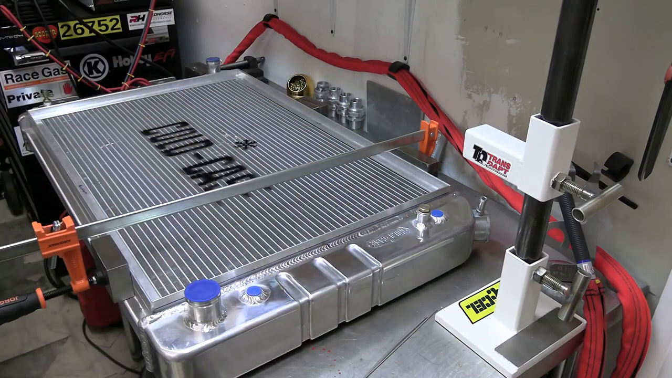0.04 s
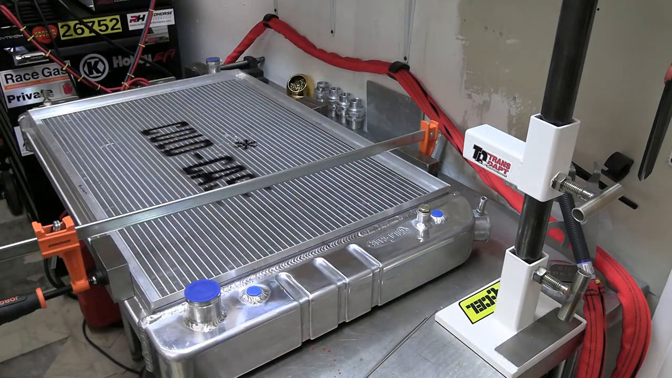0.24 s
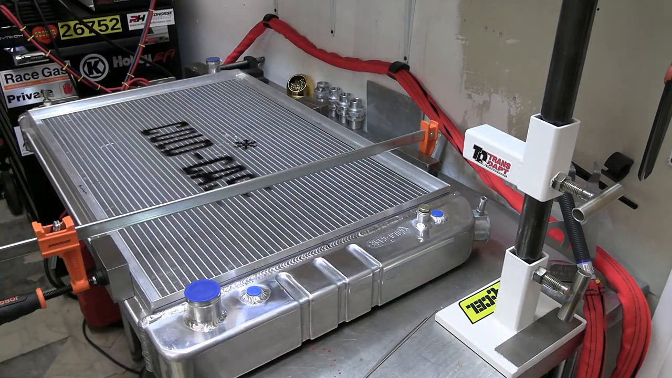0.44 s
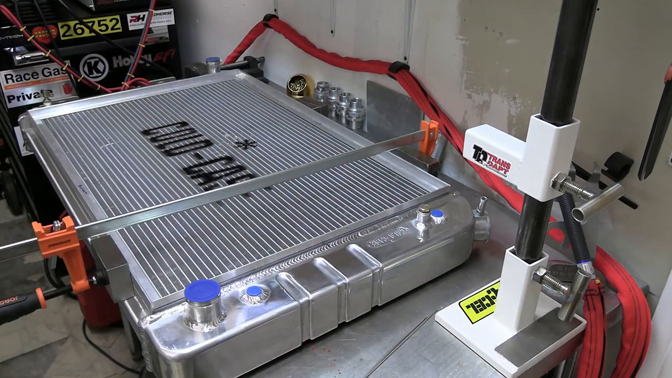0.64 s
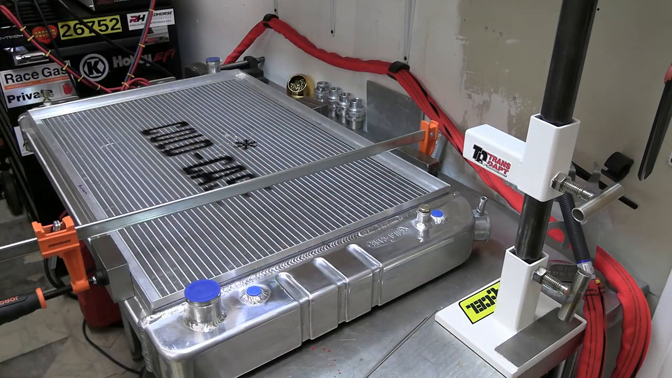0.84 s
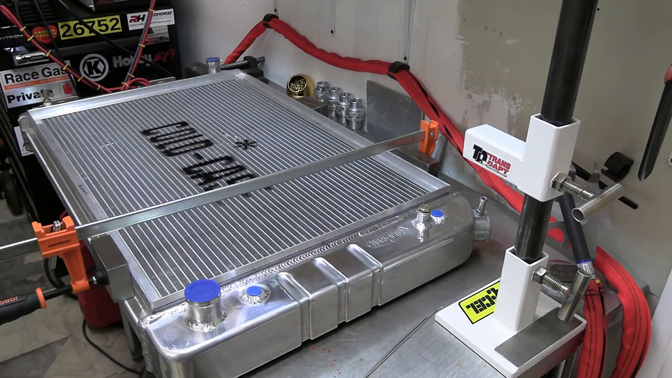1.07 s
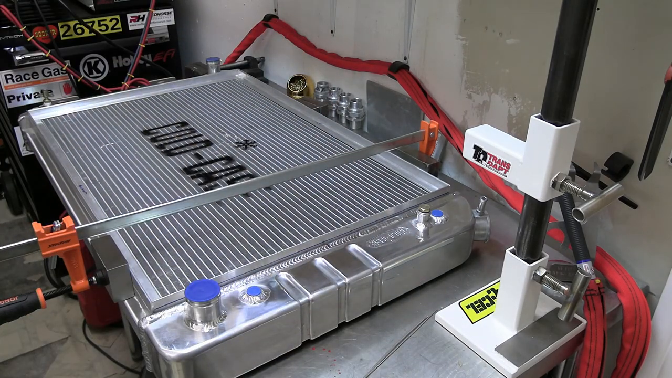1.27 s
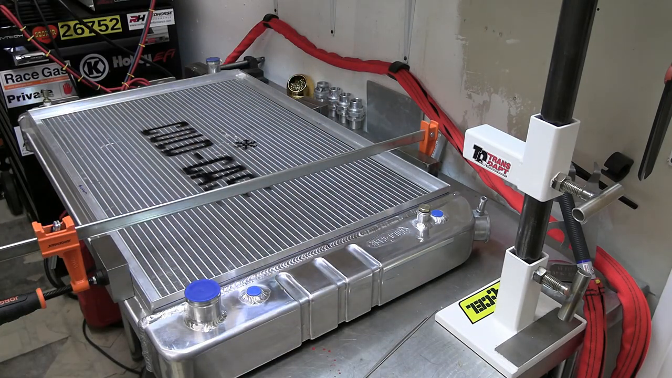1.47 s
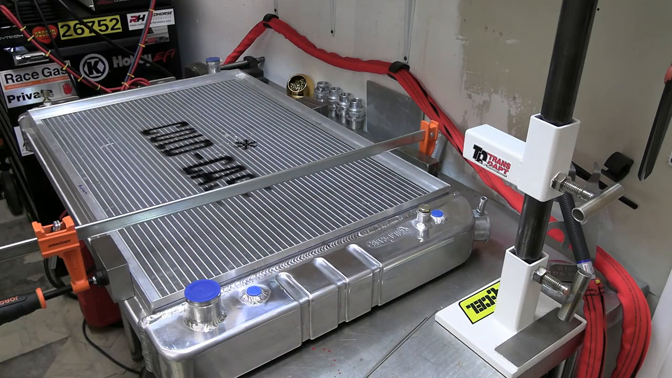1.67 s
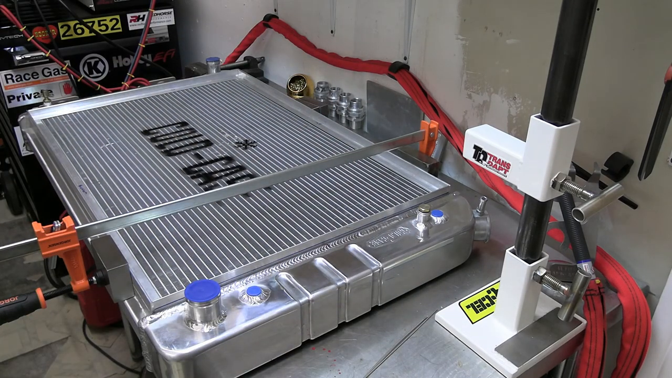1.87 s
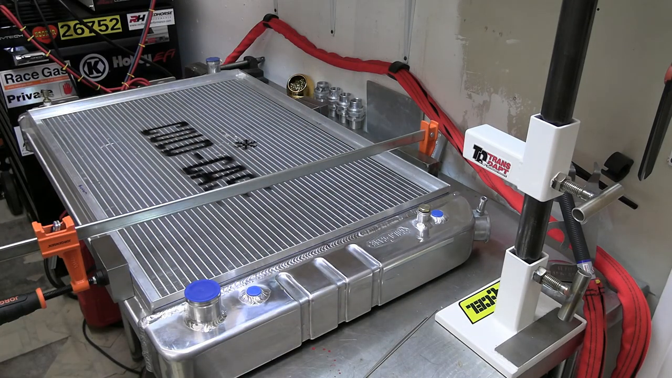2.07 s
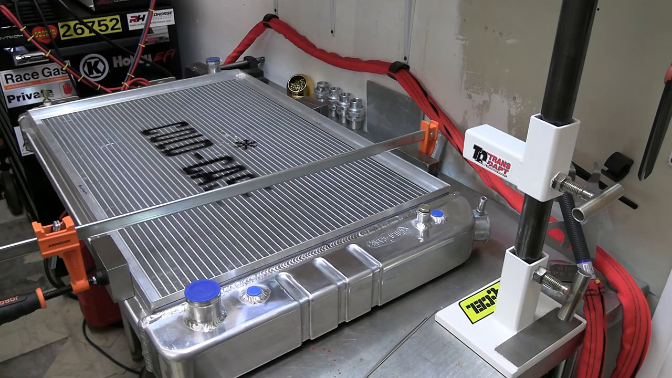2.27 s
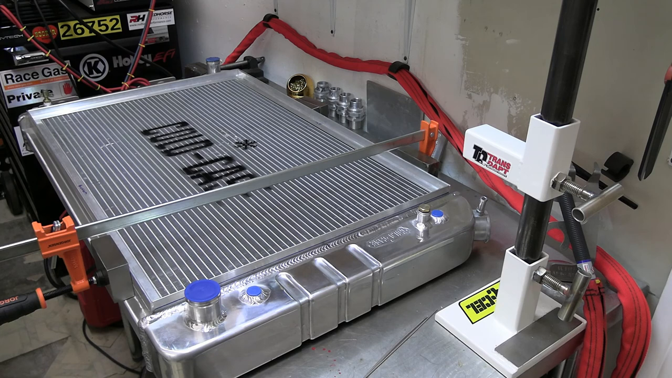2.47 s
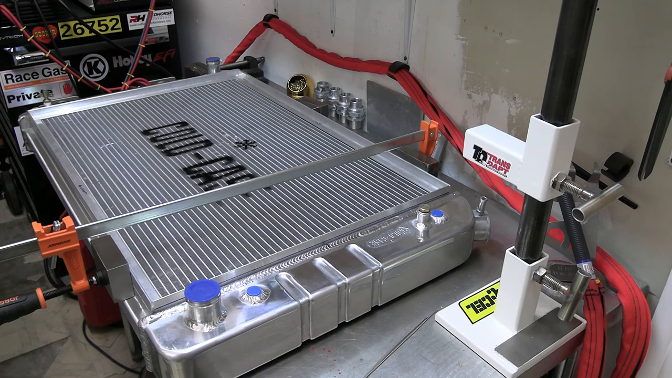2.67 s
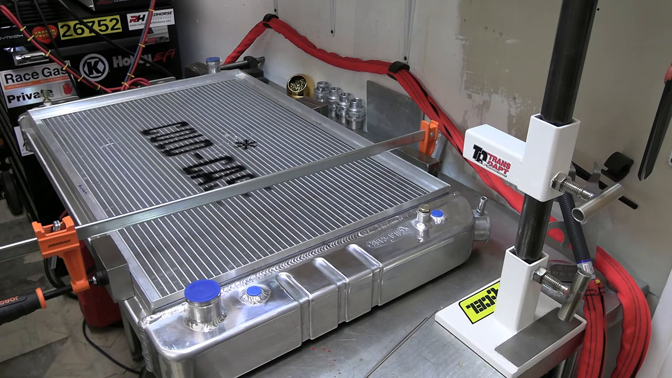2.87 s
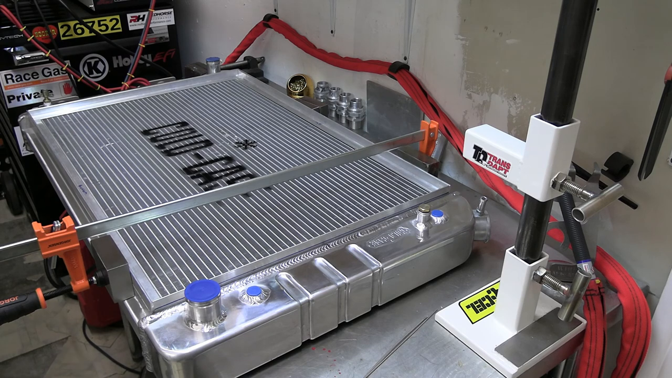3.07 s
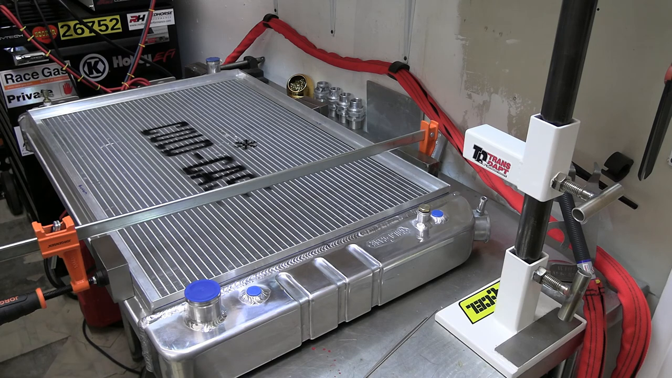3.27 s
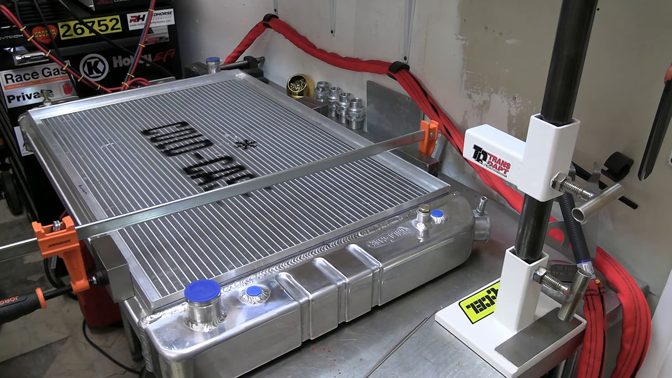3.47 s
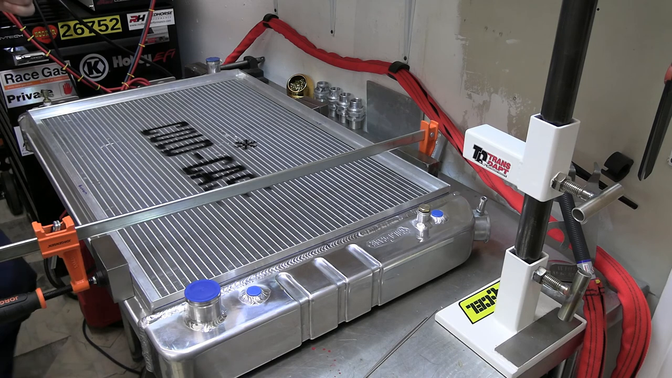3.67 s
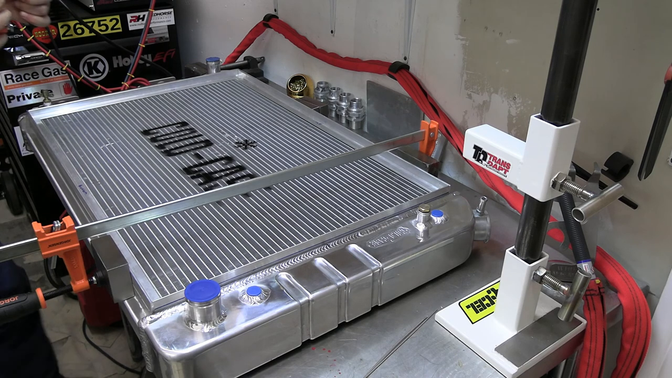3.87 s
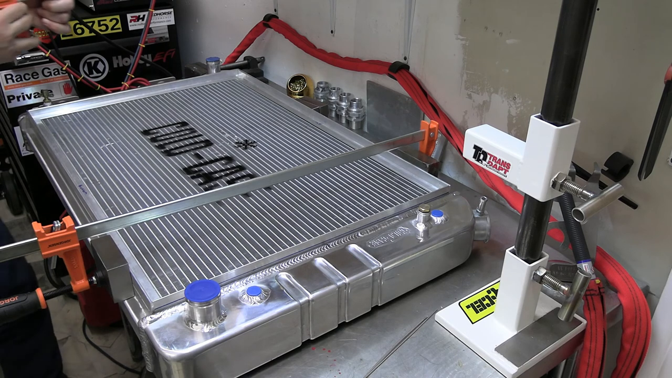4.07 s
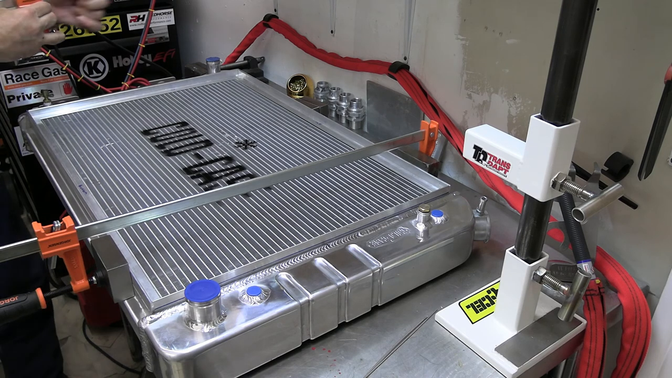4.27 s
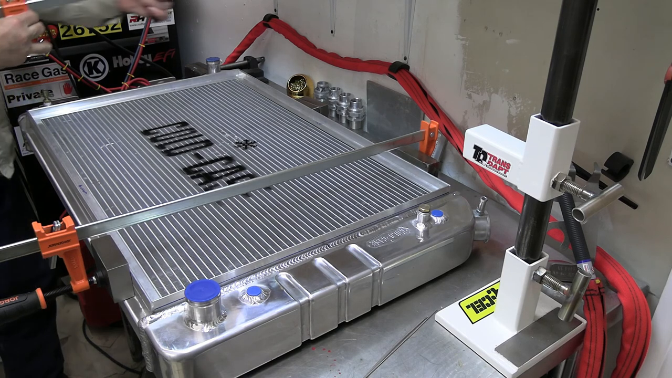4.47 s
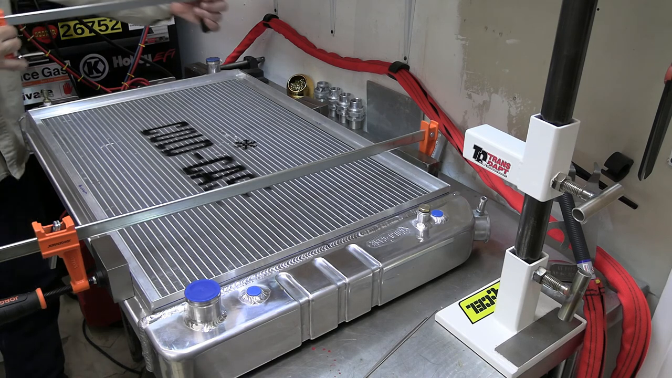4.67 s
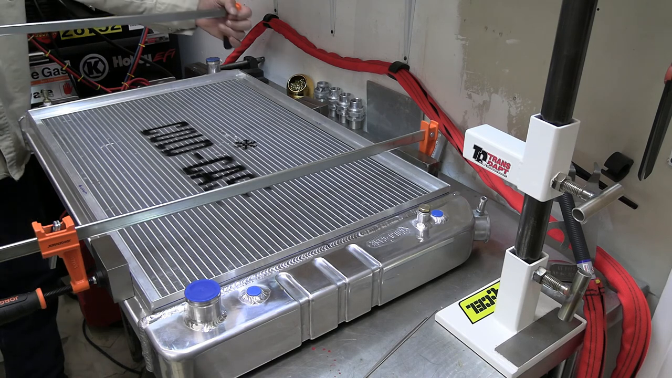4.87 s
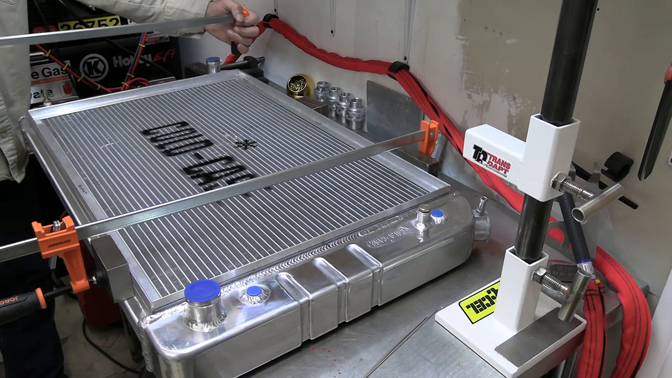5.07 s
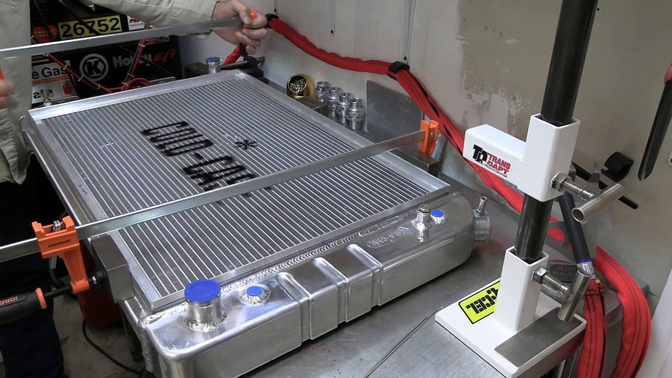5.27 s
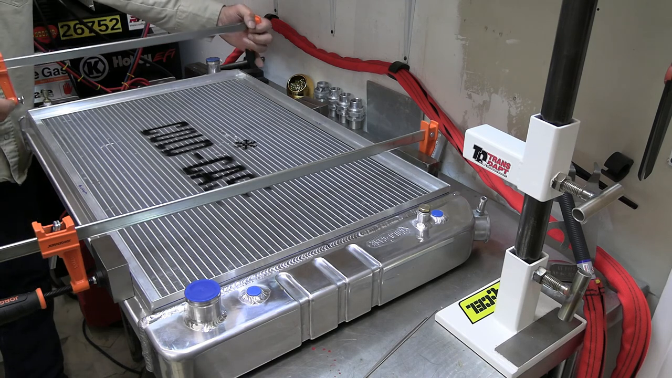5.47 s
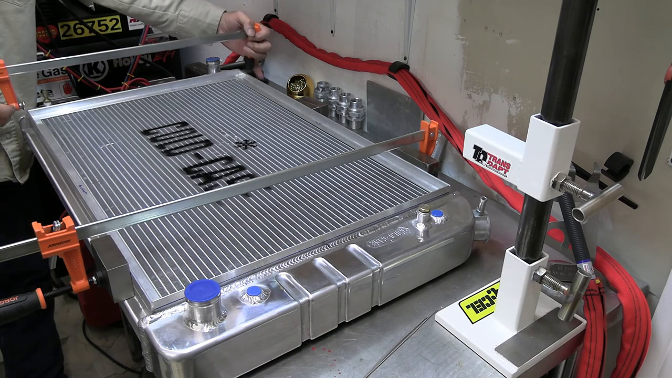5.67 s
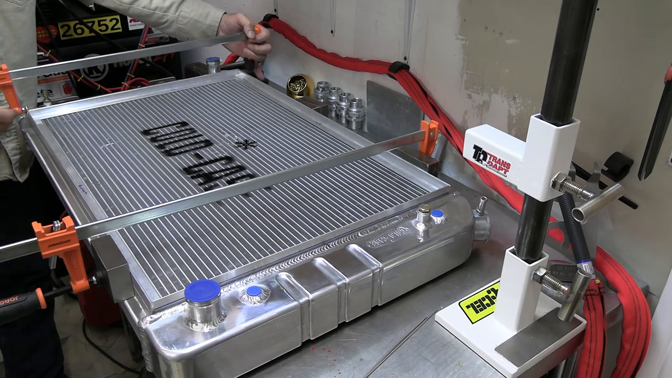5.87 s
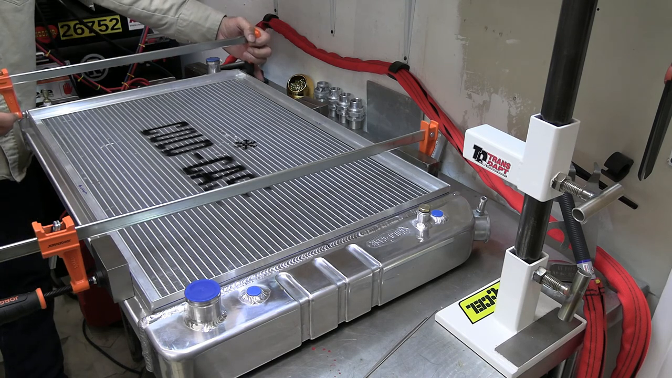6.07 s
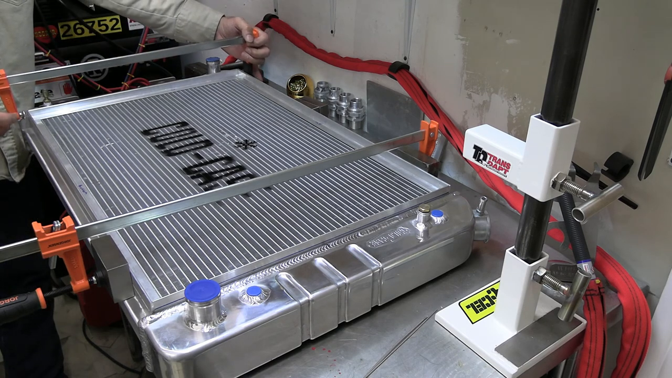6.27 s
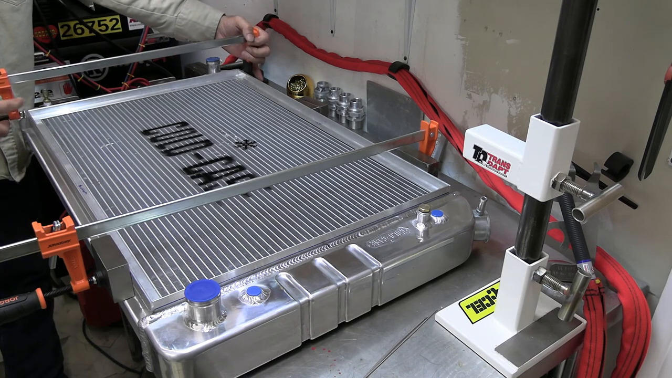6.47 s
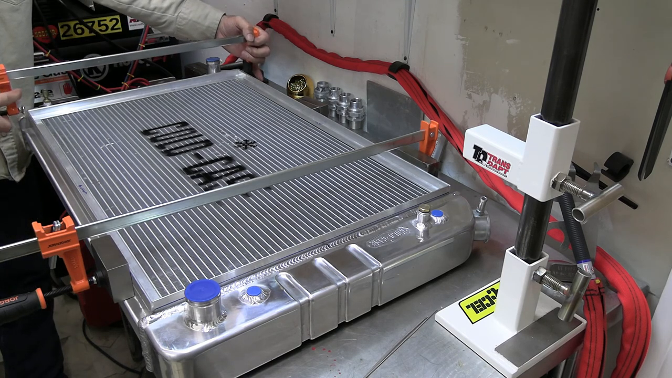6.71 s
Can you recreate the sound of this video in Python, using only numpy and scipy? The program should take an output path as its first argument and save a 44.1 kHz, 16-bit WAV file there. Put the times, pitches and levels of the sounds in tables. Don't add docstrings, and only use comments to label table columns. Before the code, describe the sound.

A low, soft fan hum and room air run throughout a small, briefly echoing workshop, heard by a close microphone that tames peaks. Faint ticks and sleeve rustle begin it. At 0.48 s a compact metal head gives a quick double clink, then soft thuds near 0.6. At 0.76 a steel rod clinks bright and rings. Heavy wooden-bench knocks land at 1.02 and 1.23 with loose rattles, a hard dry double clack at 1.38, a light tap at 1.5, and a deep boomy set-down at 1.7 with bounces. From 2 to 4.3 only small ticks, light bumps and cloth rustles. Clanks at 4.41 and 4.48 start a loud gritty scrape, ringing and singing unevenly, strongest near 4.9, stopping by about 5. Tiny clicks and a catch follow at 5.0, then a sharp double snap at 5.37. A faint tick at 5.53, soft rustle and hum finish to about 6.6.

```python
import sys
import numpy as np
from scipy import signal
from scipy.fft import rfft, irfft
from scipy.io import wavfile
from scipy.ndimage import uniform_filter1d

SR = 44100
rng = np.random.default_rng(int(sys.argv[2]) if len(sys.argv) > 2 else 0)


def boost(x):
    u = np.asarray(x, float) / 20
    return 10 ** u


def master(y):
    cut = np.clip(np.atleast_2d(y).T, -1, 1)
    pcm = np.round(cut * 32767)
    wavfile.write(sys.argv[1], SR, pcm.astype(np.int16))


N = 297234


def evened(x):
    return x / np.sqrt(np.mean(x ** 2) + 1e-20)


def read(points, hz):
    f, value = np.transpose(points)
    return np.interp(np.log(hz + 1), np.log(f + 1), value)


def add(mix, s, sound):
    part = mix[round(s * SR):][:len(sound)]
    part += sound[:len(part)]


def coloured(x, spectrum):
    gain = boost(read(spectrum, np.fft.rfftfreq(len(x), 1 / SR)))
    return irfft(rfft(x) * gain, len(x))


def resonate(x, hz, width_hz):
    r = np.exp(-np.pi * width_hz / SR)
    if np.isscalar(hz):
        return 2 * signal.lfilter([1 - r], [1, -r * np.exp(2j * np.pi * hz / SR)], x + 1e-18).real
    turn = np.exp(2j * np.pi * np.cumsum(hz) / SR)
    return 2 * (turn * signal.lfilter([1 - r], [1, -r], x / turn + 1e-18)).real


def filtered(x, order, hz, kind):
    return signal.sosfilt(signal.butter(order, hz, kind, fs=SR, output="sos"), x)


def grit(count, spread_db):
    return rng.standard_normal(count) * boost(spread_db * np.minimum(rng.exponential(1, count), 6))


def wander(count, db):
    steps = np.clip(rng.standard_normal(count // 1800 + 2), -2.5, 1.2)
    return boost(db * np.interp(np.arange(count) / 1800, np.arange(len(steps)), steps))


def air():
    # hz, level_db (per Hz)
    air_spectrum = [(7.1, -32), (12, -9), (27, 2), (44, -11.5), (71, -7), (150, -15), (259, -17.5),
                    (292, -14), (350, -18.5), (394, -17.5), (472, -19.5), (619, -24.5), (2550, -33),
                    (3550, -37), (16000, -55)]
    # hz, likeness
    same_table = [(20, 0.73), (60, 0.95), (180, .999), (550, 1), (1650, 1), (4970, 0.93), (15000, 0.21)]
    # hz, left_minus_right_db
    lean = [(60, 0.5), (240, 0.38), (950, 0.3), (3770, 0.0), (15000, 0.0)]
    # pitch_hz, width_hz, level_db
    hum = [(18.2, 3.9, -39), (180.1, 3.9, -55), (236.7, 20.5, -48.5), (258.9, 3.7, -44.5),
           (318.4, 5.8, -55.5), (351.9, 5.8, -56), (480, 2.8, -61.5), (560, 4.8, -63.5)]
    air_db = -35
    frames, hz = N // 512 + 5, np.fft.rfftfreq(2048, 1 / SR)
    a, b, c, d, patches = rng.standard_normal((frames, 1025, 5)).T
    patches = uniform_filter1d(patches, size=20, axis=0)
    patches = evened(uniform_filter1d(patches, size=8, axis=1))
    same = np.clip(read(same_table, hz), -1, 1)[:, None]
    left = a + 1j * b
    right = same * left + np.sqrt(1 - same ** 2) * (c + 1j * d)
    balance_db = read(lean, hz)[:, None] * np.array([.5, -.5])[:, None, None]
    z = np.array([left, right]) * boost(read(air_spectrum, hz)[:, None] + 1.76 * patches + balance_db)
    wash = boost(air_db - 5) * evened(signal.istft(z, nperseg=2048, noverlap=1536)[1][:, :N])
    noise = rng.standard_normal(N)
    fan = np.zeros(N)
    for f, width_hz, db in hum:
        line = evened(resonate(resonate(noise, f, width_hz), f, 2 * width_hz))
        steady = line / (uniform_filter1d(line ** 2, size=4000) + .1) ** .3
        fan += boost(db - 1) * steady
    return wash + boost(np.array([[.2], [-.2]])) * fan


def room(x):
    # hz, t60_s
    decay = [(120, 0.47), (400, 0.25), (1200, 0.31), (3000, 0.23), (7000, 0.24), (14000, 0.15)]
    # hz, level_db
    apart_table = [(100, -52), (1000, -36), (2500, -21), (5000, -19), (9000, -13), (13000, -3)]
    hz, t, z = signal.stft(rng.standard_normal((2, SR // 2)), SR, nperseg=256, noverlap=128)
    z = z / (abs(z) + 1e-12)
    z[1] *= boost(read(apart_table, hz))[:, None]
    z = z * boost(-60 * t / read(decay, hz)[:, None])
    tail = signal.istft(z, SR, nperseg=256, noverlap=128)[1]
    both, apart = tail * np.clip(np.arange(tail.shape[1]) / 500, 0, 1)
    pair = np.array([both + apart, both - apart]) / np.linalg.norm(both)
    return signal.fftconvolve(x[None], pair, axes=1)[:, :N]


def rustle():
    # peak_s, peak_db, rise_s, fall_s
    moves = [(0.3, -60, .05, .04), (0.394, -49, 0.0037, 0.026), (2.22, -67, .1, 0.034),
             (2.7, -58, 0.67, 0.5), (3.06, -55.5, .03, 0.12), (3.24, -42, 0.014, 0.03),
             (3.65, -53.5, 0.45, 0.24), (3.96, -48, 0.02, 0.039), (4.16, -40.5, 0.0032, 0.018),
             (4.27, -53, .015, 0.028), (.472, -50, .03, .003), (3.5, -58, 0.032, 0.036),
             (5.368, -42, 0.017, .003), (5.69, -67, .03, .04), (5.93, -60, .1, 0.24), (6.6, -63, 0.46, .4)]
    # hz, level_db (per Hz)
    cloth = [(800, 1.5), (2000, -4.5), (4500, 0.5), (8000, -14), (15500, -17.5), (16500, -42.5)]
    t = np.arange(N) / SR
    swell = np.zeros(N)
    for s, db, rise_s, fall_s in moves:
        swell += boost(db) * np.exp(-np.where(t < s, (s - t) / rise_s, (t - s) / fall_s))
    return swell * evened(coloured(grit(N, 2.8), cloth))


def thumps():
    # start_s, peak_db, pitch_hz, t60_s
    swings = [
        (1.695, -16, 60.4, .3),
        (1.74, -24, 95, .12),
        (1.816, -24.5, 74, .3),
        (1.83, -27, 330, .2),
        (3.953, -31, 81, 0.13),
        (4.005, -33, 90, 0.11),
        (5.037, -22, 110, 0.086),
    ]
    out, t = np.zeros(N), np.arange(SR // 3) / SR
    rise = 1 - np.exp(-t / 0.0045)
    for s, db, hz, t60_s in swings:
        add(out, s, boost(db - 60 * t / t60_s) * rise * np.sin(2 * np.pi * hz * t))
    return out


def knocks():
    # start_s, peak_db, pitch_hz
    contacts = [(1.0285, -1.5, 524), (1.034, -4, 422), (1.0545, -5, 406), (1.066, -14, 423),
                (1.079, -17, 447), (1.2455, -5, 526), (1.262, -15, 600), (1.278, -19, 400),
                (1.293, -18, 450), (1.312, -22, 500), (1.7005, -15, 1400), (1.706, -4, 1310),
                (1.712, -6, 700), (1.7255, -9, 1050), (1.732, -13, 600), (1.7425, -12, 250),
                (1.7535, -13.5, 303), (1.765, -17, 800), (1.829, -21, 500), (0.1252, -36, 700),
                (3.9527, -23.5, 600), (3.294, -33, 600), (5.04, -22, 300), (3.2255, -27, 900),
                (2.327, -34, 600), (.171, -36, 800)]
    out, t = np.zeros(N), np.arange(SR // 20) / SR
    for s, db, hz in contacts:
        add(out, s, boost(db) * np.exp(-t * hz / 0.96) * np.sin(2 * np.pi * hz * t))
    return out


def pings():
    # start_s, peak_db, pitch_hz
    notes_rung = [
        (0.593, -33.5, 1650),
        (0.878, -56, 11000),
        (1.096, -23, 2230),
        (1.128, -32, 2100),
        (1.262, -22.5, 2130),
        (2.088, -42, 2760),
        (4.039, -43.5, 2850),
        (4.165, -44, 4000),
    ]
    decay_s, relative_width = 0.014, 0.053
    out, t = np.zeros(N), np.arange(SR // 5) / SR
    for s, db, hz in notes_rung:
        puff = evened(resonate(grit(len(t), 1.9), hz, relative_width * hz))
        add(out, s, boost(db) * np.exp(-t / decay_s) * puff)
    return out


def blows(rows, modes, ring_db, tilt_db, dull_db, spread_db, clean, bass_db, heavy, deep_db=-30, rise_s=.0027):
    # from_hz, to_hz
    bands = [(1800, 6000), (150, 500), (500, 1800), (6000, 11000)]
    out, t = np.zeros((2, N)), np.arange(SR // 2) / SR
    body = np.zeros(len(t))
    for hz, db, t60_s in modes:
        body += boost(db - 60 * t / t60_s) * np.sin(2 * np.pi * hz * t) / np.sqrt(t60_s)
    body *= boost(ring_db) / (np.linalg.norm(body) + 1e-9)
    rise = 1 - np.exp(-t / rise_s)
    for s, peak_db, weight_db, hard_db, contact_s in rows:
        contact_s = max(contact_s, .001)
        levels_db = peak_db + np.array([0, bass_db + heavy * weight_db, weight_db, hard_db])
        upper, low, middle, top = (db - 10 * np.log10((b - a) / (SR / 2))
                                   for db, (a, b) in zip(levels_db, bands))
        colour = [(40, low + deep_db), (150, low - 5), (300, low), (1000, middle),
                  (2400, upper), (4800, upper + tilt_db), (8000, top), (16000, top + dull_db)]
        crack = coloured(evened(grit(len(t), spread_db)), colour) * rise * np.exp(-t / contact_s)
        strike = coloured(signal.unit_impulse(len(t), idx=60), colour) * (t < t[-1] / 2)
        strike *= np.sqrt(contact_s * SR / 2)
        add(out[0], s, crack)
        add(out[1], s, signal.fftconvolve(clean * strike + (1 - clean) * crack, body)[:len(t)])
    return out


def shelf_blows():
    # start_s, peak_db, weight_db, hardness_db, contact_s
    rows = [
        (1.689, -26, 4, -12, 0.013),
        (1.700, -10.5, -2, -21, 0.018),
        (1.7065, -16, -7, -20, 0.003),
        (1.722, -23, 1, -20, 0.01),
        (2, -46.5, 7.5, -18, 0.0092),
        (1.755, -20.5, -18, -23, 0.0077),
        (1.825, -39.5, 3, -18.5, 0.043),
        (5.041, -42, 14, -14, 0.0033),
        (0.79, -47, 13.5, -20, 0.022),
    ]
    # pitch_hz, level_db, t60_s
    modes = [(64.4, -1, 0.33), (185.5, -3, 0.17), (1090, 1, 0.045), (361, 0, 0.057), (509, -21, 0.039),
             (760, -17, 0.1), (1460, 7, 0.035), (640, -15, 0.11), (1850, 7, .05)]
    return blows(rows, modes, ring_db=-12.5, tilt_db=-7.0, dull_db=-10, spread_db=4.5,
                 clean=0.74, bass_db=5.5, heavy=1.0, deep_db=-6)


def bench_blows():
    # start_s, peak_db, weight_db, hardness_db, contact_s
    rows = [
        (1.0185, -9.5, 3, -17.5, 0.011),
        (1.029, -24, 9, -19, 0.005),
        (1.0355, -24.5, 10, -19, 0.0094),
        (1.055, -24.5, 10, -18, 0.0071),
        (1.229, -19.5, -2, -32, 0.019),
        (1.247, -19, -8, -33, 0.02),
    ]
    # pitch_hz, level_db, t60_s
    modes = [(118.5, 11, 0.26), (191, 2.5, 0.16), (226, 5, 0.14), (381, 2.5, 0.16), (428, 3, 0.089),
             (538, 3, 0.099), (652, 9, 0.05), (820, 3, .06), (936, 10.5, 0.073), (1130, 0, 0.043)]
    return blows(rows, modes, ring_db=-5.5, tilt_db=-7.5, dull_db=-15, spread_db=4.0,
                 clean=0.7, bass_db=1, heavy=0.79)


def loose_parts():
    # start_s, peak_db, weight_db, hardness_db, contact_s
    rattles = [
        (1.093, -11.5, -8, -24.5, 0.027),
        (1.247, -18, 0, -23, 0.035),
        (1.3294, -29, -7.5, -16.5, 0.088),
    ]
    # start_s, peak_db, weight_db, hardness_db
    ticks = [(0.125, -45, 12, -12), (0.171, -33, -5, -26), (0.394, -41, -23, -14), (2.026, -50, 18, -21),
             (2.0866, -34.5, -2, -41), (2.2172, -38, 5.5, -21), (2.321, -37.5, 5.5, -36),
             (2.459, -35.5, -24, -15), (2.989, -47, 2, -10), (3.0587, -41, -13, -4),
             (3.082, -35.5, 0.5, -20), (3.226, -35.5, 12.5, -2), (3.294, -42, 8, -6), (3.62, -59, -5, 15.5),
             (3.788, -51, 6, -15), (3.9526, -33, 2, -12), (4.004, -46, 15, -10), (4.0382, -35.5, 2, -18),
             (4.1645, -41, -11, -11), (4.27, -44, 4, 2), (5.5296, -45, -16, -25)]
    # pitch_hz, level_db, t60_s
    modes = [(1490, -3.5, 0.032), (2050, -3, 0.0081), (2840, 4, 0.0056), (4940, 2, 0.011)]
    tick_s = 0.0041
    out = blows(rattles, modes, ring_db=-5.0, tilt_db=-7.0, dull_db=-19, spread_db=2.5,
                clean=0, bass_db=-18.0, heavy=.1)
    return out + blows([(*row, tick_s) for row in ticks], modes, ring_db=-10.5, tilt_db=-4.0, dull_db=-7.0,
                       spread_db=1.5, clean=0.37, bass_db=1.0, heavy=0.55, rise_s=0.00082)


def screw_blows():
    # start_s, peak_db, weight_db, hardness_db, contact_s
    rows = [
        (1.3805, -11.5, -8, -12.5, 0.011),
        (1.3845, -13, -14, -14, 0.0049),
    ]
    # pitch_hz, level_db, t60_s
    modes = [(2600, 1, 0.018), (3700, -7, .03), (4220, 2, 0.037), (4900, 4, 0.027)]
    return blows(rows, modes, ring_db=-9.5, tilt_db=2.0, dull_db=-14, spread_db=1.5,
                 clean=0, bass_db=-12.5, heavy=.3, rise_s=0.0037)


def rod_blows():
    # start_s, peak_db, weight_db, hardness_db, contact_s
    rows = [
        (0.759, -14, -16, -9.5, 0.0099),
    ]
    # pitch_hz, level_db, t60_s
    modes = [(1970, 0, 0.025), (3413, -6, .1), (4100, 4.5, 0.32), (4230, 4, 0.18), (4600, -8, 0.12),
             (5630, 14, 0.24), (10400, 1, .08), (11100, 14, .08), (12200, -3, .08), (13530, 16, .2)]
    return blows(rows, modes, ring_db=-2, tilt_db=1, dull_db=-19, spread_db=2.2, clean=.95, bass_db=6, heavy=1)


def head_blows():
    # start_s, peak_db, weight_db, hardness_db, contact_s
    rows = [
        (0.4765, -9, -6, -27, 0.0044),
        (.4795, -4, -7.5, -28, 0.0039),
        (0.565, -39, 8.5, -12, 0.012),
        (0.5903, -35.5, 9, -34, 0.0085),
        (1.5087, -28.5, -4.5, -13.5, 0.0093),
    ]
    # pitch_hz, level_db, t60_s
    modes = [(1078, -1.5, 0.073), (1734, -10, 0.026), (2546, 11.5, 0.043)]
    return blows(rows, modes, ring_db=-6.0, tilt_db=0.0, dull_db=-13, spread_db=4.0,
                 clean=0.75, bass_db=-6.5, heavy=1.67)


def bar_blows():
    # start_s, peak_db, weight_db, hardness_db, contact_s
    rows = [
        (4.341, -30, -2, -23, 0.0041),
        (4.3853, -37, -23, -10, 0.0054),
        (4.4142, -5, -24, -9.5, 0.0061),
        (4.4503, -26, -4, 4, 0.0057),
        (4.4824, -5, -17, -20, 0.004),
    ]
    # pitch_hz, level_db, t60_s
    modes = [(1850, -8.5, 0.027), (2545, -1, 0.072), (3240, -10.5, 0.092), (4330, -20, 0.052),
             (5640, -7, 0.052), (6900, -4.5, 0.08), (8200, -12, .06), (10600, -10, 0.065)]
    return blows(rows, modes, ring_db=1.5, tilt_db=0.0, dull_db=-13, spread_db=7.0,
                 clean=0.41, bass_db=-4.5, heavy=0.8)


def snaps():
    # start_s, peak_db, weight_db, hardness_db, contact_s
    rows = [
        (4.991, -36, -20, 0, .002),
        (5.007, -38, -20, 0, .002),
        (5.023, -39, -20, 0, .002),
        (5.037, -38, -10, 0, 0.0015),
        (5.055, -27.5, 0, 6, 0.0029),
        (5.3712, -20, -23, -9, 0.0073),
        (5.3818, -16, -15, -5, 0.0054),
    ]
    # pitch_hz, level_db, t60_s
    modes = [(3150, 10, 0.06), (3470, 3, 0.033), (4460, 0, .03), (4850, 4, 0.027), (6970, 5, 0.05),
             (8000, 1, 0.012), (11000, 1, .02), (13600, 1, .025), (15800, 0, .02)]
    return blows(rows, modes, ring_db=-1, tilt_db=4, dull_db=-13, spread_db=1.5,
                 clean=.9, bass_db=-17, heavy=.3, rise_s=.0012)


def bar_ring(t, drive, far, stopped):
    # pitch_hz, width_hz, level_db
    ring_start = [(3250, 26, -1.5), (3465, 31, -2), (4500, 46, -10), (5660, 25, -5), (6800, 88, -10.5),
                  (8170, 20, -12), (9820, 50, -13.5), (10200, 60, -16), (11700, 60, -22),
                  (13100, 52, -42.5), (13900, 87, -28), (15700, 39, -35)]
    # pitch_hz, width_hz, level_db
    ring_end = [(3490, 47, -12.5), (4260, 110, -10.5), (4870, 96, -7.5), (5540, 84, -14), (6600, 140, -11),
                (8100, 45, -8), (9200, 170, -7.5), (10180, 83, -7.5), (13500, 140, -32), (13900, 46, -14),
                (14200, 26, -24)]
    # pitch_hz, width_hz, level_db
    ring_stop = [(4900, 160, -15), (6840, 30, 0), (9900, 51, -3), (11400, 90, -6), (12100, 35, -12),
                 (13200, 120, -4), (15100, 89, 0)]
    # hz, level_db (per Hz)
    rub = [(410, -69), (700, -26.5), (1710, -6), (2300, 11.5), (2530, -19), (2840, -8.5), (4920, 5),
           (12800, -35), (14400, -34), (15400, -34), (16000, -106)]

    def ringing(table):
        return evened(sum(boost(db) * wander(len(t), 5.3) * resonate(drive, hz, 2.3 * width_hz)
                          for hz, width_hz, db in table))

    moving = np.sqrt(1 - far) * ringing(ring_start) + np.sqrt(far) * ringing(ring_end)
    rings = np.sqrt(1 - stopped) * moving + np.sqrt(stopped) * ringing(ring_stop)
    drifting = np.zeros(len(t))
    for f, drift_per_s in zip(np.geomspace(2900, 11000, num=22), rng.uniform(-0.14, 0.33, 22)):
        mode = resonate(drive, f * (1 + drift_per_s * (t - 4.7)), 0.019 * f)
        drifting += boost(read(rub, f)) * wander(len(t), 6.9) * mode
    return rings + .9 * evened(drifting) + .7 * evened(coloured(drive, rub))


def free_lengths(t, drive):
    # start_s, length_s, from_hz, to_hz, level_db
    glides = [(4.44, 0.098, 1150, 1270, -23.5), (4.82, 0.13, 2130, 2200, -18), (4.5, 0.12, 850, 830, -42),
              (4.69, .13, 980, 800, -39), (4.63, .1, 500, 420, -45), (4.7, 0.087, 700, 560, -45),
              (4.9, 0.063, 780, 810, -41), (4.78, 0.12, 620, 520, -42.5), (4.5, 0.073, 1400, 1700, -17),
              (4.55, 0.063, 1600, 1930, -25), (4.61, 0.1, 1780, 1440, -20), (4.48, 0.19, 1300, 1310, -24.5),
              (4.58, 0.109, 1500, 980, -24), (4.975, .13, 6960, 6900, -34.5),
              (4.725, 0.035, 1780, 1820, -18), (4.79, .06, 1800, 2200, -26), (4.66, .08, 1500, 1780, -27),
              (4.86, 0.076, 1800, 1790, -29), (4.66, 0.15, 3300, 3300, -27), (4.8, 0.12, 1440, 1450, -33.5),
              (4.52, 0.13, 620, 700, -42), (4.74, 0.267, 740, 680, -41.5), (4.7, 0.155, 500, 345, -36.5),
              (4.6, 0.132, 660, 440, -44), (4.86, 0.11, 370, 337, -36), (4.56, 0.23, 4200, 4900, -20),
              (4.66, 0.13, 4700, 4100, -20), (4.78, 0.155, 4850, 5100, -14), (4.82, 0.083, 4400, 6100, -20)]
    edge_db = -12.5
    out = np.zeros(len(t))
    for at, length_s, from_hz, to_hz, db in glides:
        u = np.clip((t - at) / length_s, 0, 1)
        hz = from_hz + (to_hz - from_hz) * u
        tone = evened(resonate(resonate(drive, hz, 0.024 * hz.mean()), hz, 0.05 * hz.mean()))
        steady = evened(tone / (uniform_filter1d(tone ** 2, size=700) + .05) ** 0.3)
        sings = uniform_filter1d(1. * (u > 0) * (u < 1), size=800)
        out += boost(db + edge_db * (2 * u - 1) ** 2) * wander(len(t), 4.3) * sings * steady
    return out


def slide():
    # time_s, pressure_db
    pressure = [
        (4.33, -47),
        (4.39, -33.5),
        (4.406, -38),
        (4.418, -34),
        (4.478, -29.5),
        (4.483, -15.5),
        (4.61, -14.5),
        (4.918, -11),
        (4.926, -16.5),
        (4.96, -21.5),
    ]
    # time_s, jolt_db
    jolts = [(4.3644, 2.5), (4.469, 4.5), (4.525, 2.5), (4.541, 0.5), (4.569, 0.5), (4.59, 1.5), (4.612, 2),
             (4.638, 2.5), (4.6805, 4.5), (4.71, 0.5), (4.744, 1.5), (4.782, 3), (4.80, 1.5), (4.841, 3.5),
             (4.859, 2), (4.887, 3), (4.914, 4), (4.956, 3)]
    release_s, release_db_per_s, top_lingers_db_per_s, jolt_s = 0.1, -290, 182, 0.0063
    head_hz, head_free_db, head_gripped_db, grip_s, grip_takes_s = 2513, 6, -14.5, 4.62, 0.098
    treble_near_db, treble_far_db, low_near_db, low_far_db = -4.5, -9, 11, -6.5
    s, press_db = np.transpose(pressure)
    t = np.arange(s[0], s[-1] + release_s, 1 / SR)
    after_s = np.maximum(t - s[-1], 0)
    far, stopped = np.clip((t - 4.58) / 0.32, 0, 1), np.clip((t - 4.94) / 0.07, 0, 1)

    jolt_db = sum(db * (t > at) * np.exp(-abs(t - at) / jolt_s) for at, db in jolts)
    rub_db = np.interp(t, s, press_db) + release_db_per_s * after_s + 2 * jolt_db
    head_db = rub_db + np.interp(t, [grip_s, grip_s + grip_takes_s], [head_free_db, head_gripped_db])
    low_db = rub_db + np.interp(t, [s[3], s[5] + 0.042], [low_near_db, low_far_db])
    treble_db = rub_db + treble_near_db + (treble_far_db - treble_near_db) * far * (1 - stopped)
    treble_db += top_lingers_db_per_s * after_s

    chatter = boost(3.0 * evened(uniform_filter1d(rng.standard_normal(len(t)), size=150)))
    drive = evened(grit(len(t), 2.25) * chatter)
    bar = bar_ring(t, drive, far, stopped)
    middle, high = (filtered(bar, 4, 6000, kind) for kind in ("low", "high"))
    head = resonate(drive, head_hz, 36) + .22 * resonate(drive, 1.04 * head_hz, 60)
    low = resonate(resonate(drive, 1780, 78), 1940, 350)
    low += 0.19 * resonate(resonate(drive, 1370, 450), 1500, 460)

    sound = boost(rub_db) * evened(middle) + boost(treble_db) * evened(high)
    sound += boost(head_db) * evened(head) + boost(low_db - 14.5) * wander(len(t), 4.3) * evened(low)
    sound = filtered(sound, 3, (950, 12500), "bandpass")
    sound += free_lengths(t, drive)
    out = np.zeros(N)
    add(out, s[0], sound * signal.windows.tukey(len(t), .02))
    return out


def scene():
    bench = head_blows() + rod_blows() + bench_blows() + shelf_blows()
    bench[1] += thumps() + boost(3.0) * knocks()
    loose = loose_parts() + screw_blows()
    loose[0] += rustle() + pings()
    hand = bar_blows() + snaps()
    hand[0] += boost(1.0) * slide()
    tails = [room(crack + 0.13 * ring) for crack, ring in (bench, loose, hand)]
    near = (bench + loose + hand).sum(0)
    near = near + np.array([[-.1], [.1]]) * filtered(near, 1, 900, "high")
    walls = boost(-2.0) * tails[0] + boost(-2.0) * tails[1] + boost(np.array([[-6.9], [-6.1]])) * tails[2]
    return near + walls + air()


def masked(x):
    # hz, level_db
    mask = [(120, -40), (200, -25), (950, -24), (1200, -70), (8000, -70), (10500, -40), (12000, -33),
            (13000, -27), (14900, -27), (15400, -19), (16200, -22)]
    patchy_db = 10
    hz, _, z = signal.stft(x, SR, nperseg=2048)
    power = uniform_filter1d(abs(z) ** 2, size=7, axis=1)
    patches = uniform_filter1d(rng.standard_normal((3, len(hz) // 10 + 1, z.shape[2])), size=3, axis=2)
    patches = patches.repeat(10, axis=1)[:, :len(hz)]
    limit_db = read(mask, hz)[:, None] + patchy_db * (patches[0] + .5 * patches[1:])
    lost = power < power[:, 12:].mean(axis=1, keepdims=True) * boost(2 * limit_db)
    return signal.istft(z * ~lost, SR, nperseg=2048)[1][:, :N]


def low_pass(x):
    return signal.sosfilt(signal.butter(12, 16120, fs=SR, output="sos"), x)


def record(dry):
    power = signal.lfilter([1 / 1200], [1, 1 / 1200 - 1], (dry ** 2).mean(0))
    over_db = np.maximum(10 * np.log10(power + 1e-12) + 28, 0)
    ducked = boost(1.5) * dry / boost(.33 * over_db)
    dulled = filtered(.88 * np.tanh(ducked / .88), 10, 15650, "low")
    return low_pass(masked(dulled))


dry = scene()
out = record(dry)
master(out)
```